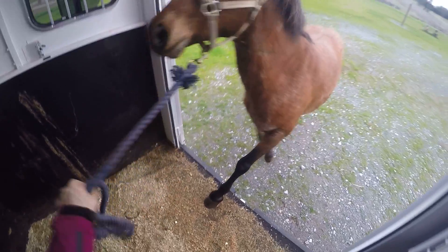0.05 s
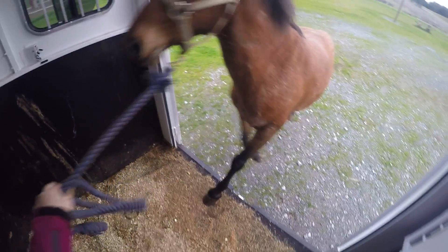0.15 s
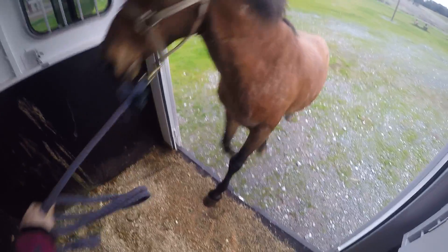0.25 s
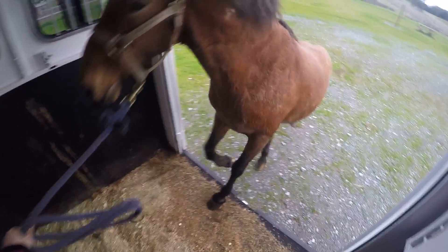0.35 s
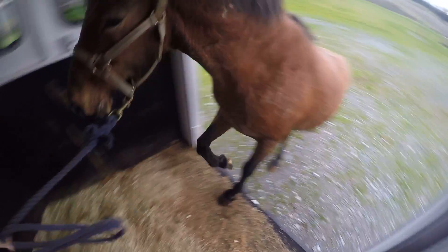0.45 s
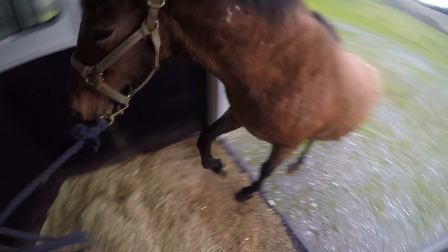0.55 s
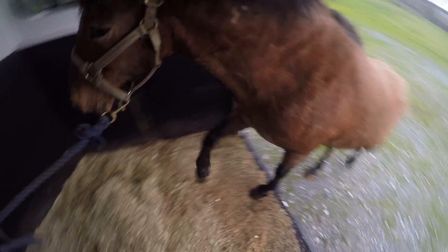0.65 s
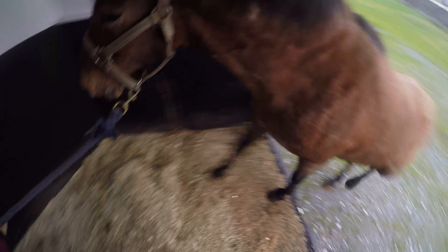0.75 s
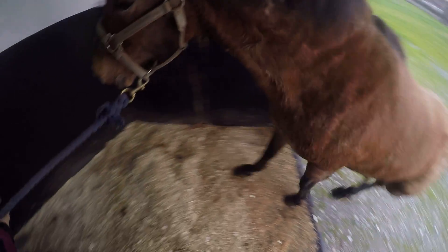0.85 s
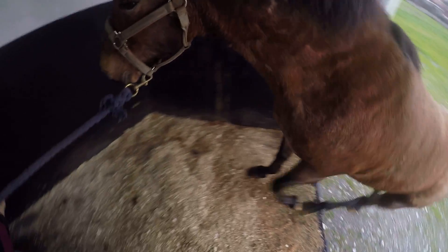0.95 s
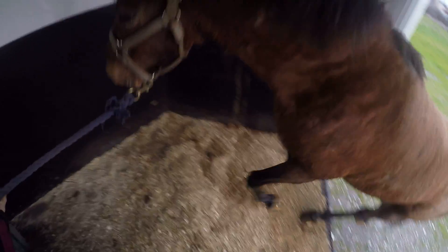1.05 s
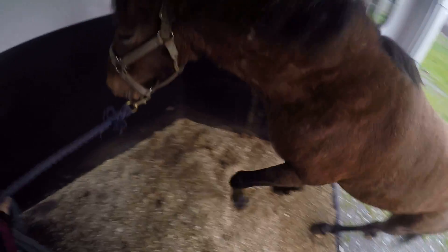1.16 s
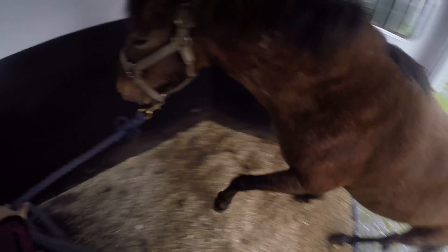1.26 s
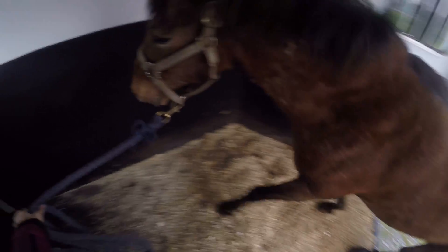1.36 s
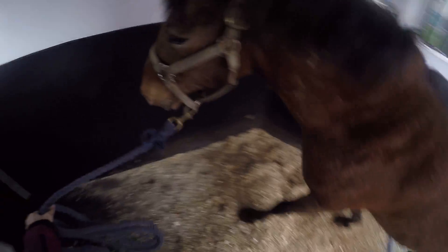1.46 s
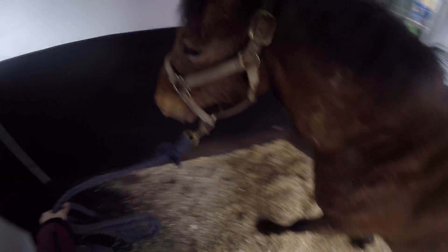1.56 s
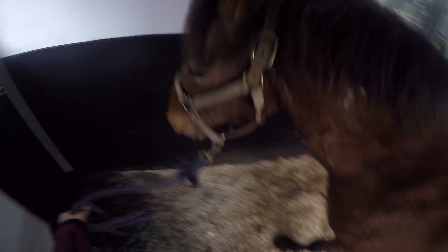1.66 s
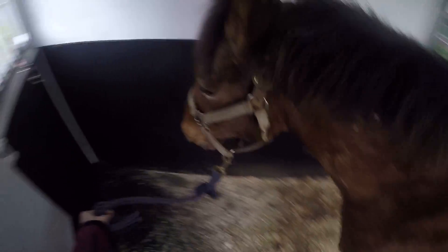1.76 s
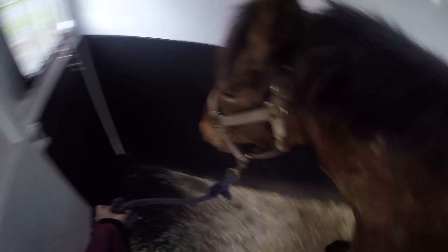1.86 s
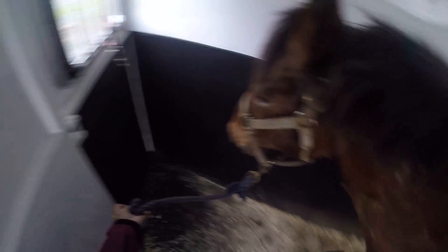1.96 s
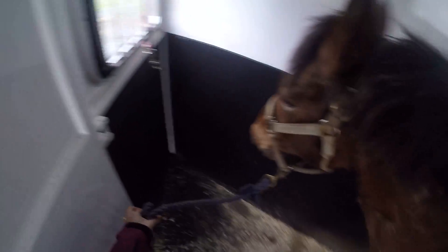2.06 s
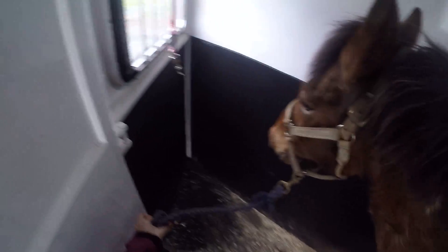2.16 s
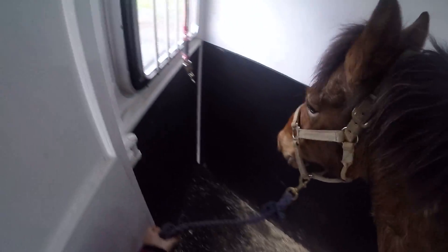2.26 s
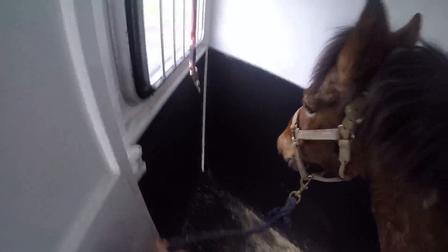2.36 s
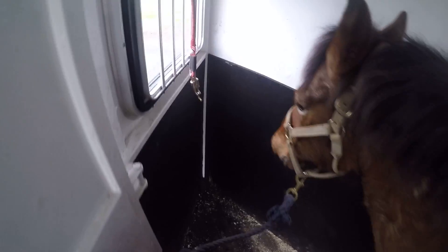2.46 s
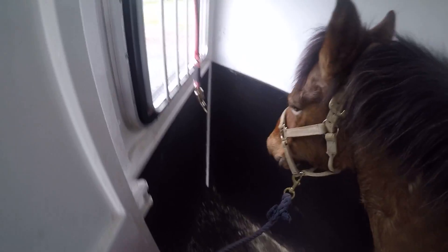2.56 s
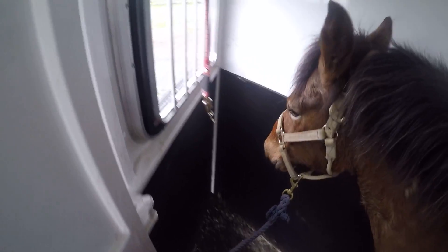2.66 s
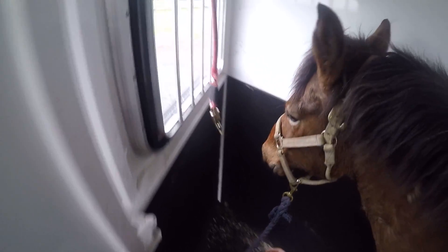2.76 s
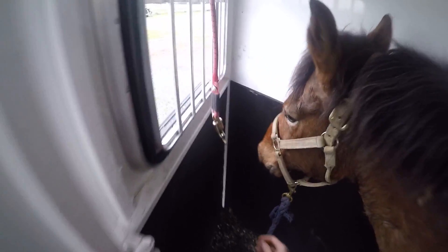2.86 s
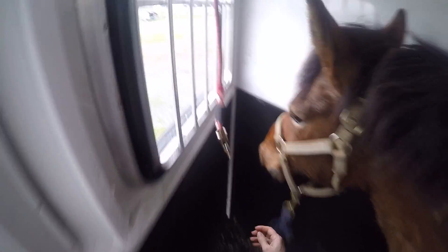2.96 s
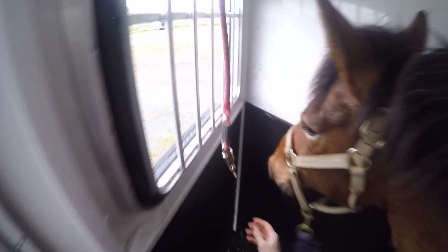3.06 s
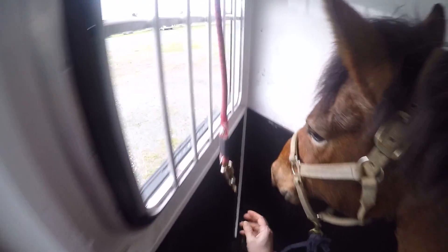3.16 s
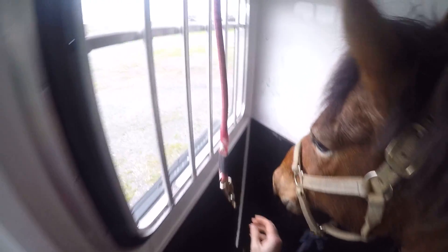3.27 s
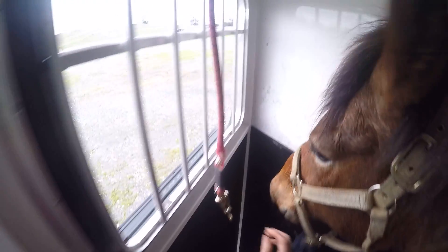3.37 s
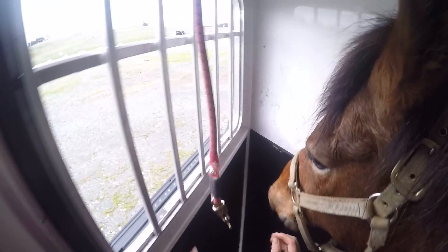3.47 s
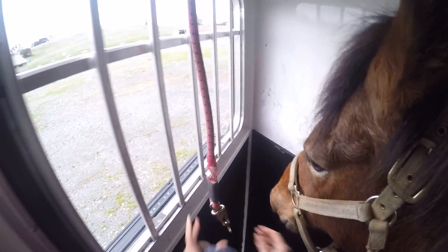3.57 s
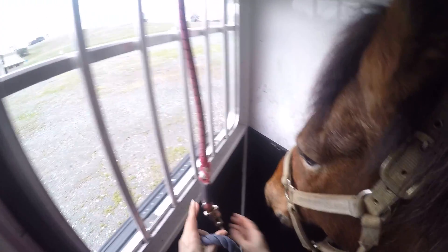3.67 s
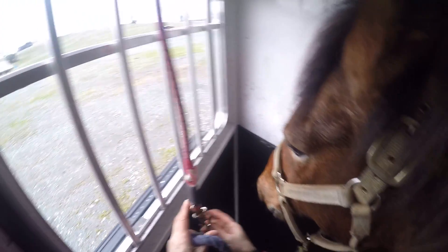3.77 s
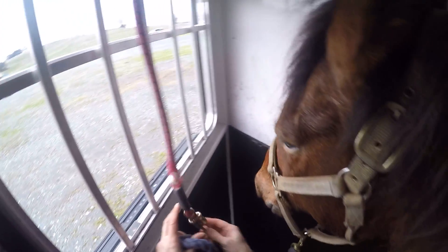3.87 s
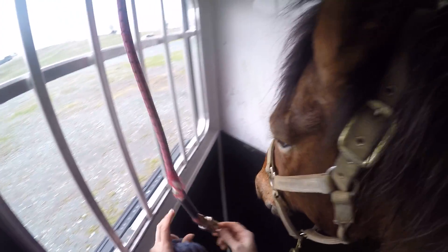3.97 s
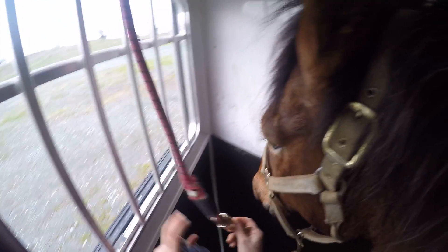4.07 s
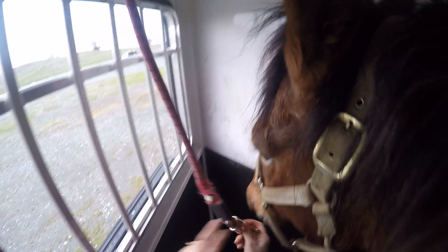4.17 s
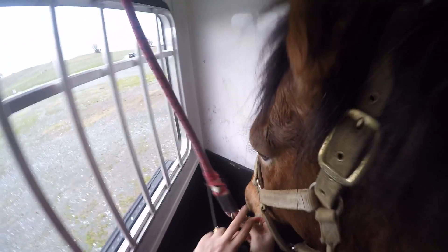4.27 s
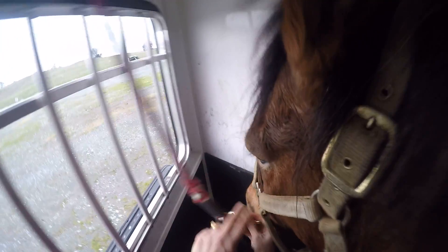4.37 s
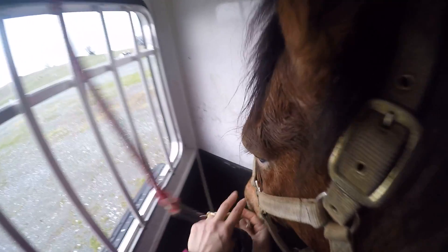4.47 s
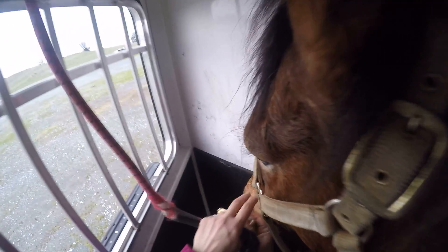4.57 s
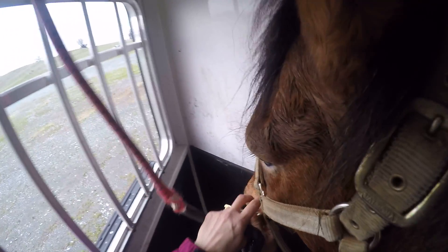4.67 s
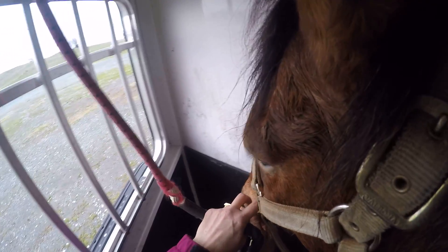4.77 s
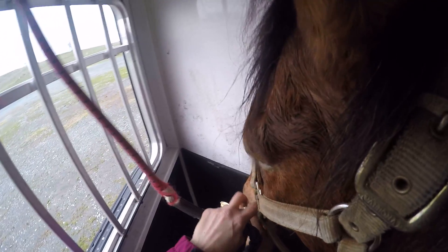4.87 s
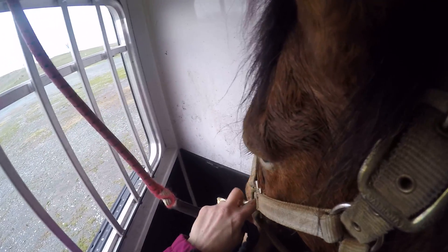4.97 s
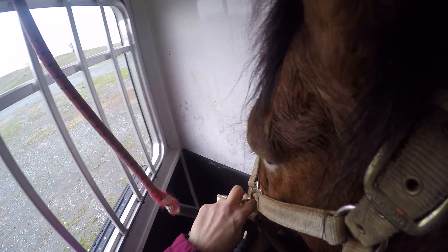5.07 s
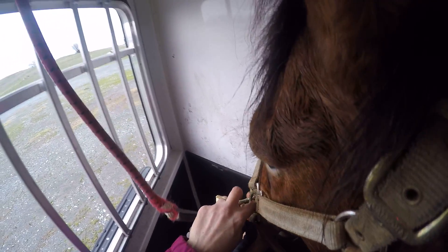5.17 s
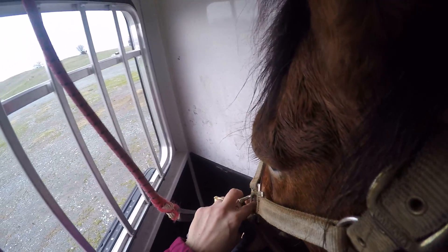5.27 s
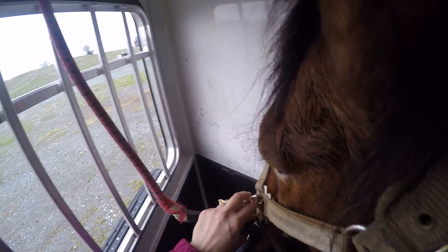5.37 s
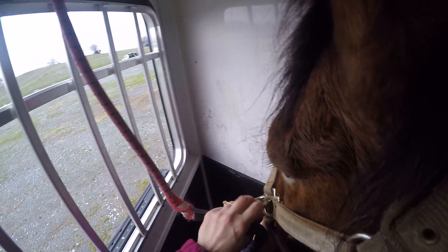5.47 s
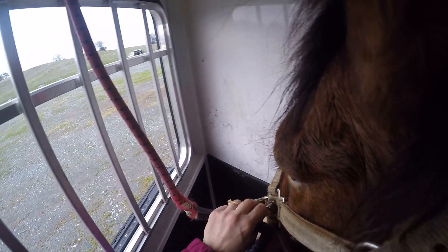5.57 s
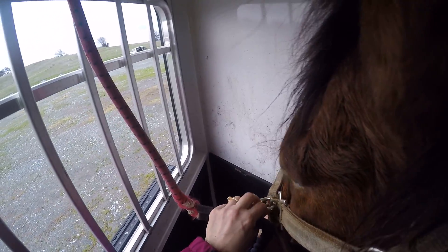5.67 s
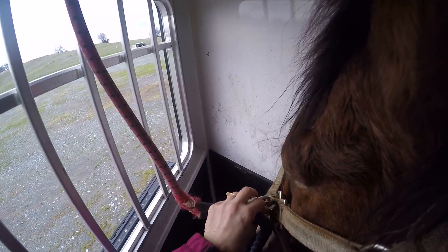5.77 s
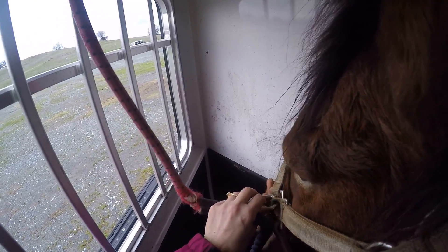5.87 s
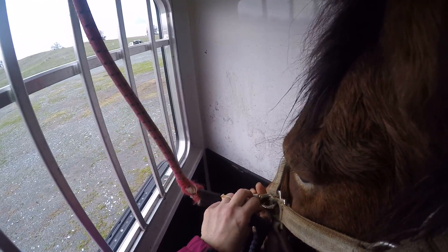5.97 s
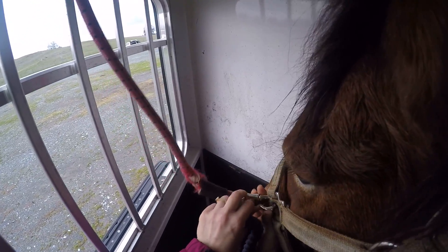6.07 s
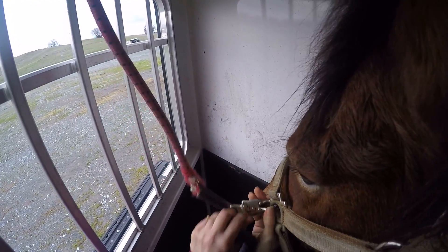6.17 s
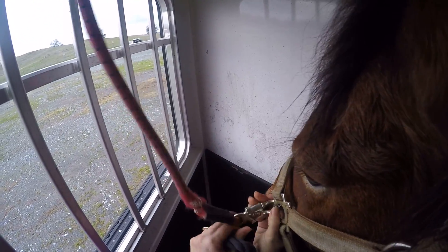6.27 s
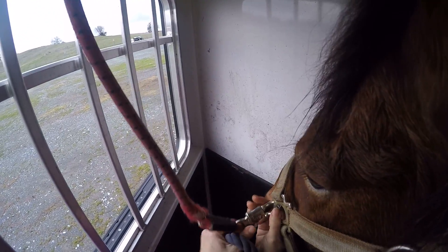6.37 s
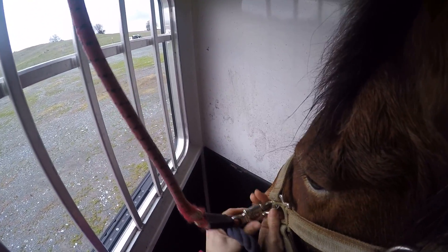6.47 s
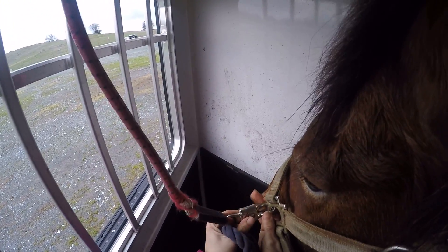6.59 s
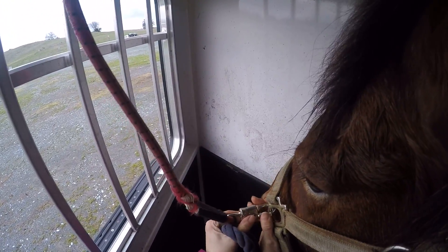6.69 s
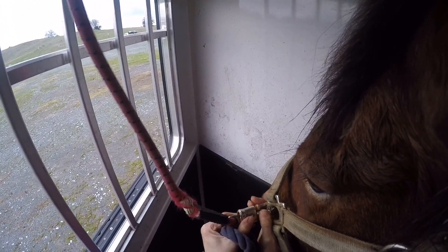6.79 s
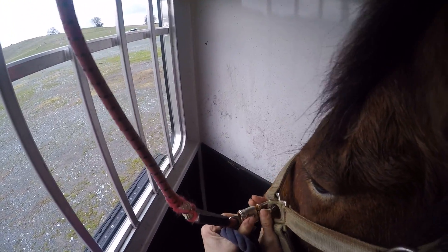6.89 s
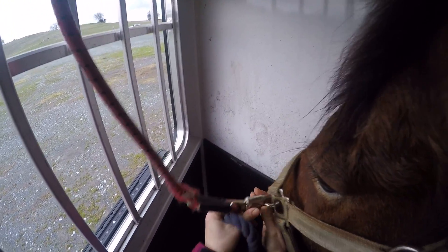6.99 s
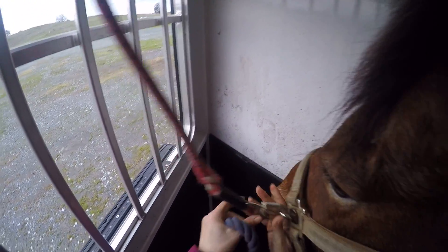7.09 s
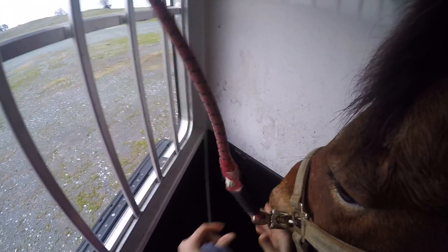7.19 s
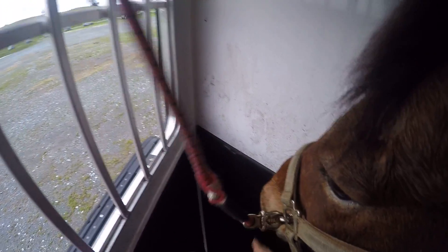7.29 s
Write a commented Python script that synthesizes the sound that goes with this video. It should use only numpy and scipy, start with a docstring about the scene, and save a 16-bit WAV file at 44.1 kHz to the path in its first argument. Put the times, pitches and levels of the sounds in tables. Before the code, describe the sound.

A horse thuds and scuffs into a trailer, with hollow microphone taps, a sharp clip click and constant fluttering electrical pops over hiss.

```python
"""Horse boarding a trailer

A horse steps up into a bedded trailer, heard through the sealed case of a small worn camera.
Hoof falls and jolts arrive as deep thuds, bedding and rope scuff, the case is tapped and a snap hook
clacks shut. The camera's radio beacon leaves a dull pop about ten times a second over circuit hiss."""
import sys
import numpy as np
from scipy import signal
from scipy.fft import rfft, irfft
from scipy.io import wavfile

SR = 44100
rng = np.random.default_rng(int(sys.argv[2]) if len(sys.argv) > 2 else 0)


def int16_out(signal):
    """Quantize to a 16-bit WAV file."""
    q = np.round(np.clip(np.atleast_2d(signal).T, -1, 1) * 32767)
    wavfile.write(sys.argv[1], SR, q.astype(np.int16))


N = 323253

# resonances of the case opening: f/Hz, width/Hz, level/dB
CASE_OPENING = [(1970, 570, 1), (2590, 600, 2.5), (3200, 490, 3), (4260, 1120, -5)]
# body movement: t/s, rustle level/dB, sway level/dB
MOVEMENT = [(0.0, -64, -33.5), (0.35, -69.5, -41.5), (1.0, -65.5, -38), (1.2, -62, -29), (1.4, -65.5, -40),
            (2.33, -68.5, -35.5), (2.55, -64.5, -33.5), (3.2, -67.5, -39.5), (3.53, -64.5, -42),
            (4.05, -67, -38.5), (4.5, -69, -43), (5.5, -69.5, -40.5), (5.98, -71, -48.5), (6.31, -67, -39),
            (6.88, -71.5, -41.5), (7.33, -63.5, -39)]


def amp(db):
    """Decibels to gain."""
    return 10 ** (np.asarray(db) / 20)


def rms_one(x):
    """Scale to unit rms."""
    return x / np.sqrt(np.mean(x ** 2) + 1e-20)


def in_time(rows):
    """Columns of a curve table, one value per sample."""
    t_s, *columns = np.transpose(rows)
    return [np.interp(np.arange(N) / SR, t_s, c) for c in columns]


def coloured(spectrum):
    """Noise with the given spectrum, rms 1."""
    hz, db = np.transpose(spectrum)
    bins_hz = np.fft.rfftfreq(N, 1 / SR) + 1
    gain = amp(np.interp(np.log(bins_hz), np.log(hz), db))
    return rms_one(irfft(rfft(rng.standard_normal(N)) * gain, N))


def drift(rate_hz):
    """Slow wander between unit-normal knots."""
    knots = rng.standard_normal(int(N / SR * 60) + 2)
    return np.interp(np.arange(N) / SR * rate_hz, np.arange(len(knots)), knots)


def low_pass(x, hz):
    """Second-order low-pass."""
    return signal.sosfilt(signal.butter(2, hz, fs=SR, output="sos"), x)


def band(x, low_hz, high_hz):
    """Band-pass, rms 1."""
    return rms_one(signal.sosfilt(signal.butter(2, [low_hz, high_hz], "band", fs=SR, output="sos"), x))


def resonate(x, peaks):
    """Parallel resonances with alternating signs, rms 1."""
    out = 0
    for k, (hz, width_hz, db) in enumerate(peaks):
        r = np.exp(-np.pi * width_hz / SR)
        poles = [1, -2 * r * np.cos(2 * np.pi * hz / SR), r * r]
        out += (-1) ** k * amp(db) * (1 - r * r) * signal.lfilter([1, 0, -1], poles, x)
    return rms_one(out)


def ring(force, hz, t60_s):
    """One mode: a unit click starts a decaying unit sine."""
    r, w = amp(-60 / (t60_s * SR)), 2 * np.pi * hz / SR
    return signal.lfilter([0, np.sin(w)], [1, -2 * r * np.cos(w), r * r], force + 1e-18)


def grit(spread_db):
    """Dense grains of uneven size."""
    return rng.standard_normal(N) * amp(spread_db * np.minimum(rng.exponential(1, N), 5))


def burst(t_s, db, t60_s):
    """Envelope of instant contacts that die away."""
    clicks = np.zeros(N)
    clicks[np.round(np.asarray(t_s) * SR).astype(int)] = amp(db)
    return signal.lfilter([1], [1, -amp(-60 / (t60_s * SR))], clicks + 1e-18)


def circuit(hiss_db=-63.5):
    """Preamplifier hiss and two fuzzy converter whines, a fifth apart."""
    # hiss spectrum: f/Hz, relative density/dB
    hiss = [(100, -0.5), (200, -0.5), (400, -9), (800, -7), (2000, -13), (3200, -21.5), (5000, -13),
            (8000, -18.5), (12000, -20.5), (16000, -23.5)]
    # converter whine, drifting with load: t/s, f/Hz, level/dB
    whine = [(0, 9600, -77.5), (1.5, 9720, -82.5), (2.5, 9680, -78.5), (4.5, 9600, -79.5), (5.2, 9510, -79),
             (7.33, 9540, -76)]
    hz, db = in_time(whine)
    phase = 2 * np.pi * np.cumsum(hz) / SR
    out = amp(hiss_db) * coloured(hiss)
    for ratio, fuzz_hz, gain_db in [(1, 130, 0), (1.5, 200, -6)]:
        a, b = low_pass(rng.standard_normal((2, N)), fuzz_hz)
        out += amp(db + gain_db) * rms_one(a * np.cos(ratio * phase) + b * np.sin(ratio * phase))
    return out


def beacon(start_s=-.00146, period_s=.1024047):
    """Each transmission loads the supply: two blips, then a sag the input coupling rebounds from."""
    def blip(age_s, hz, width_hz):
        return np.exp(-np.pi * width_hz * age_s) * np.sin(2 * np.pi * hz * age_s)

    n = round(.1 * SR)
    t = np.arange(n) / SR
    on = amp(-30.5) * blip(t, 600, 520)
    off = amp(-35.3) * blip(np.maximum(t - .00151, 0), 800, 1300)
    u = 2 * np.pi * 120.5 * np.maximum(t - .00187, 0)
    pole = np.exp(-2 * np.pi * 502 / SR)
    sag = signal.lfilter([1 - pole], [1, -pole], amp(-19) * u * np.exp(1 - u))
    w = 2 * np.pi * 29.9
    coupling = signal.bilinear([1, 0, 0], [1, w / 1.28, w * w], SR)  # high-pass, Q 1.28
    pop = signal.lfilter(*coupling, -on - off - sag)
    train = np.zeros(N + n)
    at = np.round(np.arange(start_s, N / SR, period_s) * SR).astype(int) + n
    train[at] = amp(rng.normal(0, 0.073, len(at)))
    return signal.fftconvolve(train, pop)[n:n + N]


def rustle():
    """Bedding and clothes rub, heard through the case opening."""
    db, _ = in_time(MOVEMENT)
    return amp(db + 1.4 * drift(rate_hz=25)) * resonate(grit(1.4), CASE_OPENING)


def sway():
    """Body sway makes an unsteady rumble."""
    # rumble spectrum: f/Hz, relative density/dB
    rumble = [(8, -4), (20, 0.5), (40, 5), (55, 4), (70, -4), (90, -23.5), (120, -25), (220, -30),
              (400, -46.5), (900, -56), (3000, -110)]
    _, db = in_time(MOVEMENT)
    return amp(db + 3.7 * drift(rate_hz=11)) * coloured(rumble)


def thuds(tail_s=0.035):
    """A soft push swells and rings out: a rise, a deep trough, a rebound."""
    # jolts through floor and body: t/s, level/dB, f/Hz, length/s
    jolts = [(0.018, -24, 39.8, 0.028), (0.19, -11.5, 43, 0.021), (0.227, -22, 49.3, 0.015),
             (0.401, -11.5, 45.2, 0.021), (0.604, -9.5, 45.4, 0.02), (0.639, -19, 48.6, 0.016),
             (0.863, -22, 90.6, 0.039), (0.899, -12, 52, 0.027), (1.107, -11, 52.6, 0.028),
             (1.227, -19, 49.8, 0.012), (1.537, -14, 49, 0.043), (1.824, -35, 98.5, 0.028),
             (1.905, -25, 45, 0.017), (2.264, -22, 46.7, 0.026), (2.412, -12.5, 41.8, 0.031),
             (2.474, -13, 52.3, 0.012), (2.51, -7.5, 38.1, 0.036), (3.272, -21, 47.6, 0.019),
             (3.33, -20, 42.8, 0.033), (3.897, -24.5, 40.2, 0.031), (4.238, -24.5, 47.7, 0.023),
             (4.334, -11, 39.3, 0.019)]
    out, t = np.zeros(N), np.arange(N) / SR
    for t_s, db, hz, length_s in jolts:
        near = slice(max(round((t_s - .15) * SR), 0), round((t_s + .3) * SR))
        age_s = t[near] - t_s
        push = np.exp(-2 * (age_s / length_s) ** 2)
        tail = amp(-9) * np.exp(-np.maximum(age_s, 0) / tail_s) * (1 - push) * (age_s > 0)
        out[near] += amp(db) * (push + tail) * np.cos(2 * np.pi * hz * age_s - 2)
    return out


def case_taps():
    """A blunt tap strikes each case mode, then chatters briefly, the treble dying first."""
    # taps on the case: t/s, strength/dB, tilt/(dB/octave)
    taps = [(0.035, -39.5, -2), (1.2, -26.5, -1.5), (1.605, -33, 1), (1.879, -25.5, 1.5), (2.13, -40, -0.5),
            (3.048, -41, -0.5), (3.611, -43, 2), (4.029, -35, -2), (4.226, -29, -0.5), (5.456, -43, -3.5),
            (6.909, -39, 0.5), (6.986, -38, 1), (7.146, -32, 0.7)]
    # case modes: f/Hz, level/dB, t60/s
    modes = [(206, 0, 0.067), (632.4, -15, 0.045), (799, -8, 0.03), (1173, 1.5, .016), (1287, -1.5, 0.014),
             (1790, -2.5, 0.0074), (2325, -3.5, 0.012), (2880, -11, 0.012), (3330, -10, 0.013),
             (3640, -11.5, 0.012), (4150, -10.5, 0.011), (5680, -14, 0.0094), (6300, -18, 0.006),
             (7000, -13.5, 0.0069), (8800, -26, .006), (12100, -13, .005)]
    t_s, db, tilt = np.transpose(taps)
    strikes = np.round(t_s * SR).astype(int) + round(.0006 * SR)
    scatter_db = rng.normal(0, 1.22, (len(taps), len(modes)))
    knock_db = -42 + 0.78 * (db + 35)  # lowest mode grows more slowly than the tap
    out, chatter = np.zeros(N), grit(1.27)
    for k, (hz, mode_db, t60_s) in enumerate(modes):
        level_db = knock_db if k == 0 else db + mode_db + tilt * np.log2(hz / 1500) + scatter_db[:, k]
        envelope = burst(t_s, level_db - 23, t60_s=0.034 * (hz / 1000) ** -.3)
        force = np.roll(chatter, 997 * k) * envelope  # own chatter per mode
        force[strikes] += amp(level_db) * (-1) ** k
        out += ring(force, hz, t60_s)
    return low_pass(out, hz=7500)


def scuffs(fade_t60_s=0.14, bite_t60_s=0.017):
    """Hoof, bedding and tack scrape: a bite, a held drag, then a fade in which top and ring die first."""
    # scrapes: t/s, level/dB, low/dB, top/dB, ring/dB, bite/dB (these four re level), hold/s
    scrapes = [(.162, -44.5, -17, -14.5, -6, 8, .0071), (.372, -44.5, -16, -14.5, 1, 11, .004),
               (0.442, -54, 0.5, -3.5, -19, -3, .0043), (0.575, -44, -17, -10, -8, 9.5, .0036),
               (0.704, -53.5, -9, .6, -16, 4, .016), (0.829, -51.5, 13, -6, -6, -14.5, 0.016),
               (0.901, -55.5, -4, -12, -0.5, -2.2, 0.05), (1.053, -43.5, 8.5, -24, -9, -16, 0.012),
               (1.114, -59, -6, -16, -2, -3, 0.084), (1.202, -55.5, -5, -9.5, -4, -5, 0.074),
               (1.31, -60, -3.5, -10, -15, -2, 0.048), (1.924, -64, -6, -5, -6, -3, .025),
               (4.133, -56, 7.5, -23, -10, -8, 0.008), (4.27, -59, -4, -10, -10, -2, .03),
               (4.438, -60, 2, -15, -14, -2, .005), (4.542, -52, 1.5, -20, 7, 13, .006),
               (5.784, -66, -18, 1, 5, -2, .005), (6.736, -72, -2, 8, -10, 13.5, .0018),
               (7.013, -70, -10, -20, 3, 6, .004), (7.164, -69, -10, -2, 3, -6, .052),
               (7.241, -64, 9.5, -21, 14, 12.5, .0024)]
    # treble resonances: f/Hz, width/Hz, level/dB
    top_peaks = [(4480, 470, -1), (5360, 950, -2), (6020, 710, -1.5), (7340, 850, -7), (9450, 2500, -14.5),
                 (12600, 3000, -18)]
    ring_peak = [(3173, 450, 0)]  # same columns
    low = band(grit(3.5), 155, 1800)
    top = resonate(grit(2.5), top_peaks)
    mid = band(resonate(grit(2.9), CASE_OPENING), 1780, 3870)
    ringing = resonate(resonate(grit(2.1), ring_peak), ring_peak)
    out = np.zeros(N)
    for t_s, db, low_db, top_db, ring_db, bite_db, hold_s in scrapes:
        start = round(t_s * SR)
        age_s = np.arange(min(round(.35 * SR), N - start)) / SR
        near = slice(start, start + len(age_s))
        rise_s = .0025 * amp(-0.66 * bite_db)  # harder bite, faster start
        attack = amp(db) * (1 - np.exp(-age_s / rise_s))
        fade = amp(-60 * np.maximum(age_s - hold_s, 0) / fade_t60_s)
        bite = amp(bite_db - 60 * age_s / bite_t60_s)
        out[near] += attack * (fade * amp(low_db) * low[near]
                               + (fade + bite) * mid[near]
                               + (fade ** 1.7 + bite) * amp(ring_db) * ringing[near]
                               + (fade ** 1.2 + bite) * amp(top_db) * top[near])
    return out


def airy_swell(peak_s=3.64, peak_db=-65, rise_s=0.31, fall_s=0.1):
    """A faint hiss swells slowly and drops away fast."""
    # hiss resonances: f/Hz, width/Hz, level/dB
    peaks = [(3320, 300, 3.5), (4960, 840, -4), (7200, 950, -2.5)]
    age_s = np.arange(N) / SR - peak_s
    envelope = np.exp(-(age_s / np.where(age_s < 0, rise_s, fall_s)) ** 2)
    return amp(peak_db) * envelope * resonate(rng.standard_normal(N), peaks)


def snap_hook(slam_s=6.878, bounce_s=.0034):
    """The gate slams and bounces, treble weakening as the low modes build; the spring rattles on."""
    # hook modes: f/Hz, level/dB, t60/s
    modes = [(2300, -17, 0.014), (2680, -16, 0.0082), (3290, -9, 0.027), (3400, -12.5, .02),
             (5130, -10, 0.012), (5950, -8.5, 0.0055), (6950, -10, .008), (7450, 0.5, 0.01),
             (7600, -1, 0.01), (8470, -8, 0.012), (8740, -2, 0.0097), (9050, -4, 0.0067), (9800, -17, .01),
             (10400, -6, 0.019), (10860, -7, .014), (11400, -16, 0.009), (12100, -13, 0.011),
             (12900, -15, 0.012), (13500, -11, .012), (14350, -11, .01), (15200, -4, .012)]
    bounce = np.arange(4)
    strikes = np.round((slam_s + bounce_s * bounce) * SR).astype(int)
    db = -26 - 6.5 * bounce
    low_db = -22.5 + 16.5 * np.minimum(bounce, 2)
    scatter = rng.normal(0, 1, (len(bounce), len(modes), 2))
    out, chatter = np.zeros(N), grit(1.7)
    rattle = burst([slam_s], db[0] - 23, t60_s=0.024) + burst([slam_s], db[0] - 34.5, t60_s=0.093)
    for k, (hz, mode_db, t60_s) in enumerate(modes):
        is_low = hz < 4000
        force = np.roll(chatter, 997 * k) * rattle * amp(-8 * is_low)  # light spring: weak low modes
        strike_db = db + low_db * is_low + 1.7 * scatter[:, k, 0]
        force[strikes] += amp(strike_db) * np.sign(scatter[:, k, 1])
        out += amp(mode_db) * ring(force, hz, t60_s)
    return out


def scene():
    """All sources, one channel."""
    acoustic = rustle() + sway() + thuds() + case_taps() + scuffs() + snap_hook() + airy_swell()
    return (acoustic + beacon() + circuit())[None]


def record(dry):
    """Two steep low-passes: 28 dB down from 15.4 kHz, 60 dB more from 16.8 kHz."""
    shelf = signal.cheby2(12, 28, 15400, fs=SR, output="sos")
    cut = signal.cheby2(12, 60, 16800, fs=SR, output="sos")
    return signal.sosfilt(np.vstack([shelf, cut]), dry)


dry = scene()
out = record(dry)
int16_out(out)
```